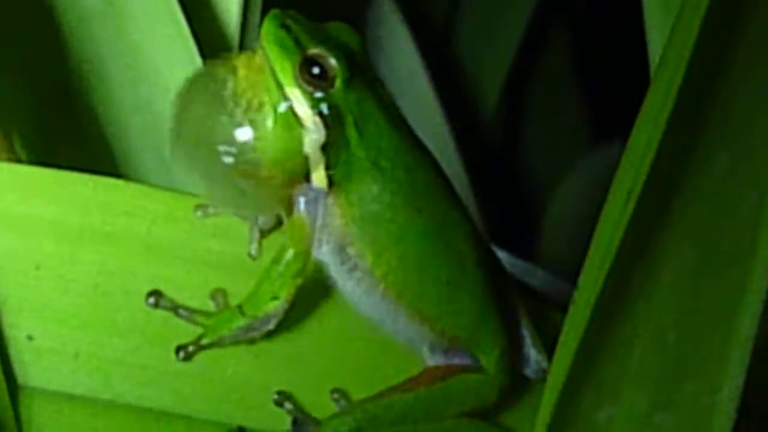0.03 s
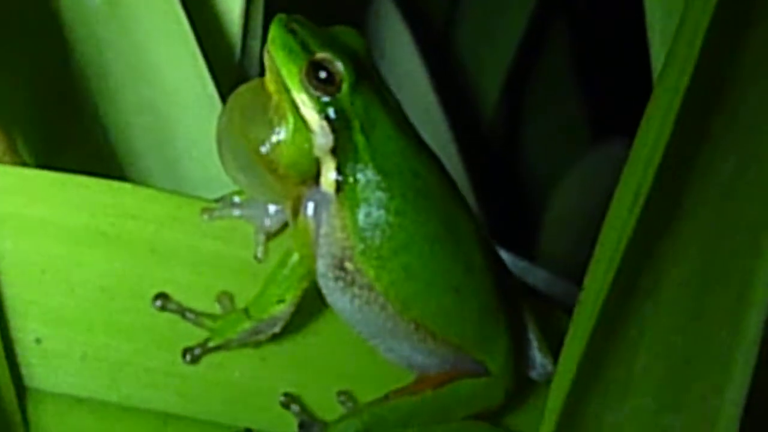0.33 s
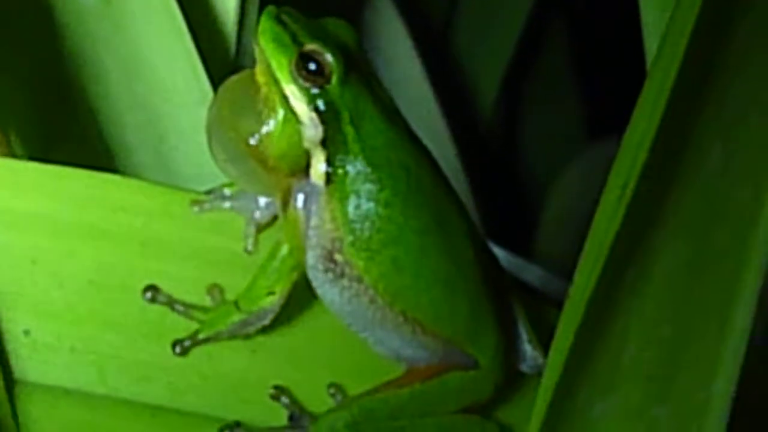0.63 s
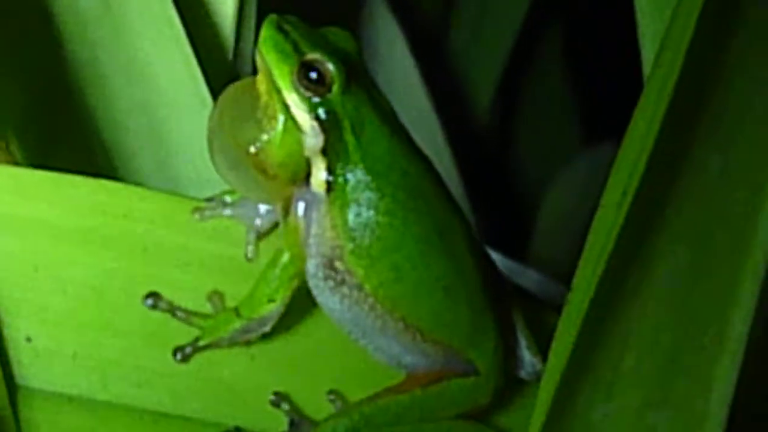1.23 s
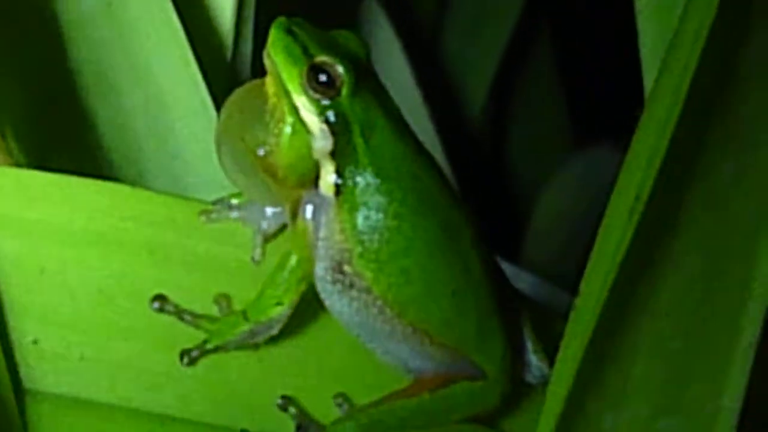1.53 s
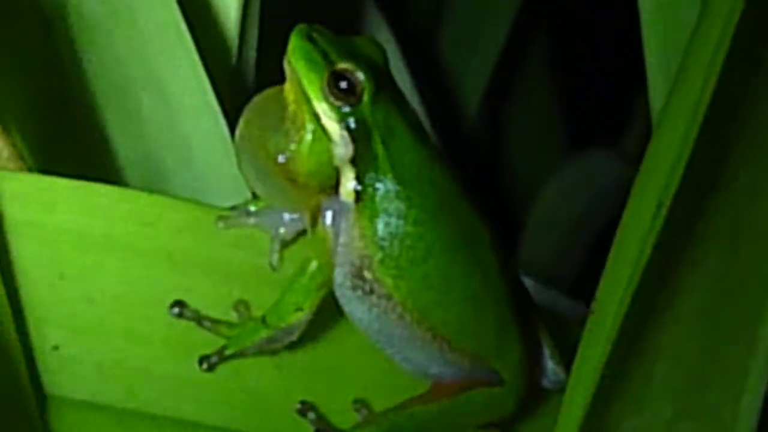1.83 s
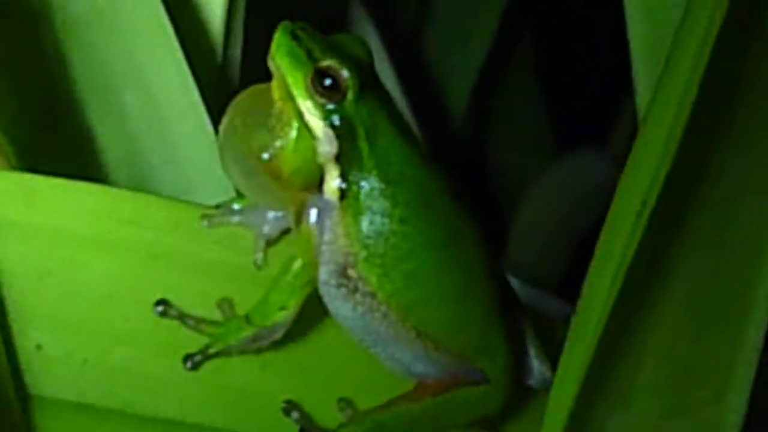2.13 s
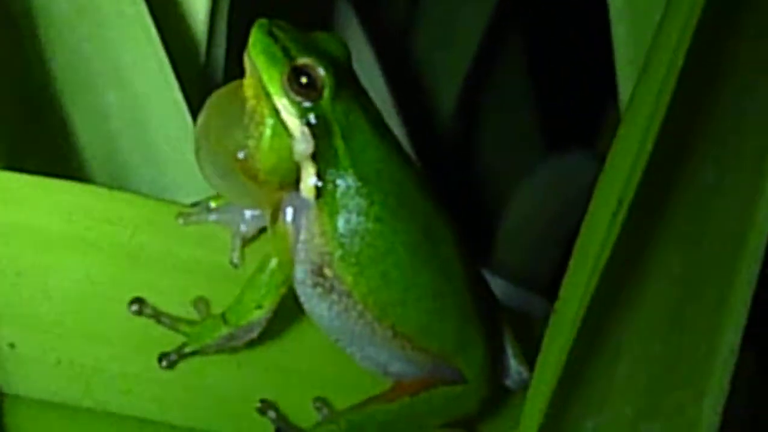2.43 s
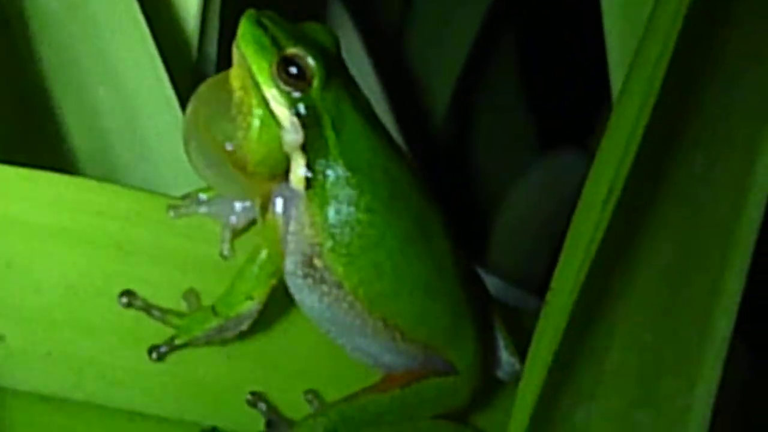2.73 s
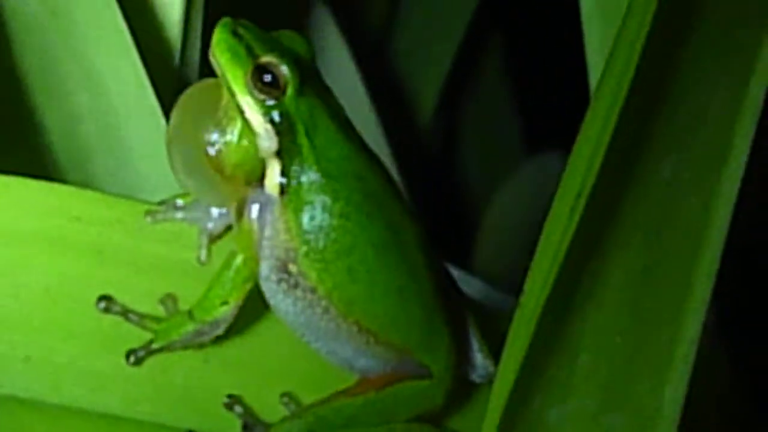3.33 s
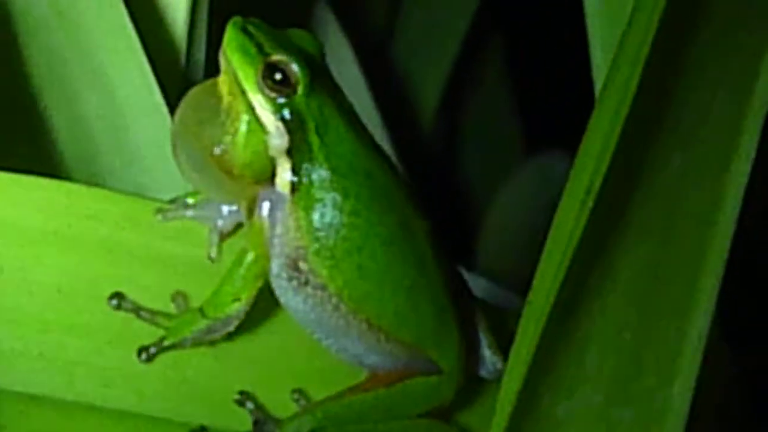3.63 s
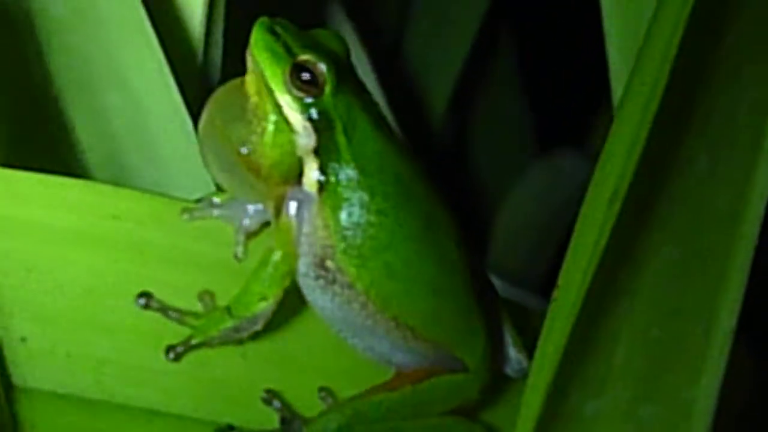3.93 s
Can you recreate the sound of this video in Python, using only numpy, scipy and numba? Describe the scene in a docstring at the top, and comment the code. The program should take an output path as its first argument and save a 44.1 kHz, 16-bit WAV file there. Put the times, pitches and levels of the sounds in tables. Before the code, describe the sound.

A small tree frog close by gives one brief, high ratchety note. Farther off, two frogs bleat in long overlapping trills, then a neighbouring tree frog answers twice. Thin insect buzzes and a distant chorus fill the night foliage.

```python
"""First a small tree frog on a nearby leaf gives one brief ratchety note, a quick run of tiny tones. Farther
off, one frog and then another bleat: pulses ring their throats in long overlapping trills that slow down and
rise in tone. Insects and a distant caller buzz thinly meanwhile, and a far frog starts to croak. Near the end a
neighbour answers the tree frog twice. All along, leaves scatter the notes and trills over a distant chorus and
a low rumble, and the recorder turns itself down after sharp notes."""
import sys
import numpy as np
from scipy import signal
from scipy.fft import rfft, irfft
from scipy.io import wavfile
from scipy.ndimage import uniform_filter1d
from numba import njit

SR = 44100
rng = np.random.default_rng(int(sys.argv[2]) if len(sys.argv) > 2 else 0)


def inscribe(sig):
    """Save sig as 16-bit PCM at rate SR to the path in sys.argv[1].

    A 1-D sig is mono; a 2-D sig holds one channel per row.
    Samples are clipped to [-1, 1] before scaling.
    """
    pcm = np.round(np.clip(np.atleast_2d(sig).T, -1, 1) * 32767)
    wavfile.write(sys.argv[1], SR, pcm.astype(np.int16))


N = 176400  # 4 seconds


# the tiny tones in the close frog's note: t/s, level/dB, f/Hz, length/s
TREE_FROG_PULSES = [(.0022, -6.8, 3580, .0038), (.0092, -3.2, 3680, .004), (.0173, -4.8, 3760, .0048),
                    (.0246, -7.5, 3850, .0062), (.04, -8, 3540, .0108)]

def tree_frog():
    """A close frog's ratchety note, with only a little echo from the leaves."""
    call = note(TREE_FROG_PULSES, sag_hz_per_s=65000, overtone_db=-21, rasp_db=-27, skew=.45)
    return undb(.5) * foliage(call, leaves_db=-20, leaves_s=.014, tail_db=-19, tail_s=.35)


# the tiny tones in the two answering notes: t/s, level/dB, f/Hz, length/s
ANSWER_PULSES = [(3.3964, -19.5, 3850, .0015), (3.4031, -13.5, 4050, .0015), (3.4104, -15, 4100, .0016),
                 (3.4178, -16.5, 4250, .0018), (3.425, -24, 4600, .002), (3.436, -16.5, 4400, .002),
                 (3.4431, -23, 4550, .0016), (3.4593, -28, 4600, .0016), (3.4673, -32, 4300, .0016),
                 (3.65, -18, 4200, .0016), (3.6516, -21, 4700, .003), (3.6549, -15.5, 4500, .0018),
                 (3.6568, -17, 4700, .0028), (3.6654, -21, 4100, .003), (3.6735, -29, 3800, .004)]

def neighbour():
    """Another tree frog answers twice, raspier and more scattered by the leaves."""
    call = note(ANSWER_PULSES, sag_hz_per_s=17000, overtone_db=-35, rasp_db=-15, skew=.89)
    return undb(1.5) * foliage(call, leaves_db=-5.5, leaves_s=.014, tail_db=-8, tail_s=.45)


# how each frog's bleat changes as it goes: t/s, pulse rate/Hz, throat f/Hz, level/dB
EARLY_BLEAT = [(.6945, 101, 2110, -52), (.8, 100.4, 2190, -45), (.95, 99.6, 2290, -39),
               (1.15, 98.1, 2360, -33.5), (1.4, 96.3, 2440, -34), (1.6, 95.4, 2560, -36.5),
               (1.8, 94.8, 2600, -36), (2.1, 94, 2590, -35.5), (2.3, 93.5, 2560, -44)]
LATE_BLEAT = [(1.5462, 104.7, 2150, -39.5), (1.88, 100.5, 2274, -35.5), (2.0, 99.26, 2290, -34),
              (2.199, 97.08, 2515, -34), (2.548, 96.19, 2670, -33), (2.9, 94.66, 2650, -34),
              (3.199, 95.66, 2783, -35), (3.398, 94.8, 2820, -51)]
# the steady tones at which a frog's body rings: f/Hz, width/Hz, level/dB
BODY_TONES = [(1480, 290, -11.5), (1960, 450, -13.5)]

def bleats():
    """Slowing pulses ring two rising throat tones, and body tones that grow as the vocal sac fills."""
    throats, bodies, t = np.zeros(N), np.zeros(N), times()
    fade_s, sac_fill_s, band_hz = .049, 1, (840, 6700)
    for bleat in (EARLY_BLEAT, LATE_BLEAT):
        at, rate, hz, db = np.array(bleat).T
        start, length = at[0], at[-1] - at[0]
        pulses = clicks(np.interp(t, at, rate), jitter=.0035, scatter_db=1.2, start=start)
        effort = undb(np.interp(t, at, db) + .39 * drift(18)) * swell(start, length, fade_s, fade_s)
        effort *= np.sqrt(np.mean(t > start))  # so a late start does not make the call louder
        pitch = np.interp(t, at, hz) * (1 + .01 * drift(70))
        upper_hz = 3216 + .43 * (pitch - hz[0])  # follows only part of the rise
        lower = unit(ring(pulses, pitch, width_hz=220))
        upper = unit(ring(pulses, upper_hz, width_hz=190))
        throats += effort * (lower + undb(-16) * upper)
        body = sum(undb(level) * unit(ring(pulses, f, width)) for f, width, level in BODY_TONES)
        sac_fullness = np.clip(.32 + (t - start) / sac_fill_s, 0, 1)
        bodies += effort * body * sac_fullness
    throats = foliage(throats, leaves_db=-7, leaves_s=.008, tail_db=-3, tail_s=.55)
    bodies = foliage(bodies, leaves_db=-8, leaves_s=.004, tail_db=-4, tail_s=.7)
    return signal.sosfilt(signal.butter(2, band_hz, "bandpass", fs=SR, output="sos"), throats + bodies)


# brief loud peaks in the bleats: t/s, level/dB, f/Hz
BLEAT_PEAKS = [(1.476, -21, 2450), (1.885, -21, 2450), (1.906, -22, 2450), (2.149, -17.5, 2490),
               (2.159, -18, 2550), (2.1794, -17.5, 2610), (2.2727, -21, 2610), (2.2844, -22, 2630),
               (2.2944, -23, 2610), (3.202, -23, 2700)]

def bleat_peaks(length_s=.0035):
    """Short tones add brief loud peaks that stand out from the bleats' pulses."""
    tones = [(start, db, hz, length_s) for start, db, hz in BLEAT_PEAKS]
    peaks = note(tones, sag_hz_per_s=20000, overtone_db=-45, rasp_db=-34, skew=.6)
    return foliage(peaks, leaves_db=-11, leaves_s=.006, tail_db=-10, tail_s=.5)


# each high buzz, from insects near 7 kHz or a distant caller near 4.8 kHz: t/s, length/s, f/Hz, level/dB
HIGH_BUZZES = [(.77, 0.8, 7000, -61.5), (2.433, 0.82, 7000, -60), (0.894, 0.19, 4870, -53),
               (1.38, 0.22, 4750, -53.5), (3.223, 0.32, 4710, -54.5)]

def high_buzzes():
    """Thin high buzzes come and go, each a narrow band of fluttering hiss: insects near 7 kHz, a distant caller
    near 4.8 kHz."""
    out = np.zeros(N)
    for start, length, hz, db in HIGH_BUZZES:
        hiss = ring(rng.standard_normal(N), hz, width_hz=280)
        buzz = unit(hiss * undb(2 * drift(120)))
        out += buzz * undb(db) * swell(start, length, attack_s=.043, release_s=.078)
    return out


# each short, low croak: t/s, length/s, level/dB
FAR_CROAKS = [(2.563, 0.099, -52.5), (3.134, 0.17, -57), (3.947, 0.19, -53)]

def croaks():
    """A far frog's uneven pulses ring one low, dull tone."""
    voice = unit(ring(clicks(rate_hz=70, jitter=.297, scatter_db=1.2), hz=678, width_hz=113))
    return voice * sum(undb(db) * swell(start, length, .0078, .014) for start, length, db in FAR_CROAKS)


# how loud the far trills are: t/s, level/dB
TRILL_LEVELS = [(0, -102), (.65, -54), (1.7, -36.5), (3.379, -39), (3.5, -49.5), (4, -48.5)]

def far_trills():
    """Two trilling frogs stand out of the chorus, blurred by the leaves."""
    pulses = np.zeros(N)
    for rate_hz in (88, 110):
        train = clicks(rate_hz * (1 + .04 * drift(5)), jitter=.0502, scatter_db=3.5)
        pulses += train * undb(1.2 * drift(6))
    upper = unit(ring(pulses, hz=2422, width_hz=450))
    lower = unit(ring(pulses, hz=1552, width_hz=180))
    trills = foliage(upper + undb(-4) * lower, leaves_db=2, leaves_s=.018, tail_db=-6, tail_s=.92)
    return unit(trills) * undb(curve(TRILL_LEVELS))


# the chorus's mix of low and high sound: f/Hz, level/dB
CHORUS_COLOUR = [(300, -23), (700, -9.5), (1050, -9.5), (1300, -5.5), (1550, 3), (1900, -1), (2650, 4.5),
                 (3300, 1), (3700, -4.5), (4100, -0.5), (4400, -7.5), (4750, 0.5), (5400, -15.5),
                 (6300, -16), (7250, -9.5), (7900, -27), (8800, -27)]
# how loud the chorus is: t/s, level/dB
CHORUS_LOUDNESS = [(0, -44), (0.601, -48.5), (1.298, -44), (3.3, -42.5), (3.55, -45), (4, -46)]

def chorus():
    """Countless far callers merge into a flickering wash of noise."""
    return coloured_noise(CHORUS_COLOUR) * undb(curve(CHORUS_LOUDNESS) + .87 * drift(12))


# the rumble's mix of low and high sound: f/Hz, level/dB
AIR_COLOUR = [(40, -14), (120, 1.5), (300, -3), (700, -6), (1050, -20), (3000, -40.5)]
# how loud the rumble is: t/s, level/dB
AIR_LOUDNESS = [(0, -55), (.7, -57.5), (1.5, -55.5), (2.3, -53), (4, -55)]

def night_air():
    """The night air makes a low, wavering rumble."""
    return coloured_noise(AIR_COLOUR) * undb(curve(AIR_LOUDNESS) + drift(14))


def note(pulses, sag_hz_per_s, overtone_db, rasp_db, skew):
    """Each pulse is a short tone that swells fast and sags in pitch, with an octave and some rasp."""
    out = np.zeros(N)
    rasp = unit(ring(rng.standard_normal(N), hz=5200, width_hz=2400))
    for start, db, hz, length in pulses:
        age = np.clip(times() - start, 0, length)
        phase = 2 * np.pi * (hz * age - sag_hz_per_s * age * (age - length / 2) / 2)
        shape = np.sin(np.pi * (age / length) ** skew) ** 2  # a smaller skew peaks sooner
        tone = np.sin(phase) + undb(overtone_db) * np.sin(2 * phase)
        out += undb(db) * shape * (tone + undb(rasp_db) * rasp)
    return out


def clicks(rate_hz, jitter, scatter_db, start=0):
    """A train of pulses, uneven in timing (jitter, a share of one gap) and in strength."""
    timing, strength = rng.standard_normal((512, 2)).T
    cycles = np.cumsum(rate_hz * np.ones(N)) / SR
    due = np.arange(len(timing)) + jitter * timing
    at = np.interp(due, cycles - cycles[int(start * SR)], np.arange(N))
    size = undb(scatter_db * strength) * (at < N - 1)
    i = at.astype(int)  # each pulse is shared between samples i and i + 1
    return (np.bincount(i, size * (1 - at + i), N + 1) + np.bincount(i + 1, size * (at - i), N + 1))[:N]


def foliage(x, leaves_db, leaves_s, tail_db, tail_s):
    """Direct sound, quick echoes off nearby leaves, and a longer tail from the bush."""
    t = np.arange(SR // 2) / SR
    noise = rng.standard_normal((2, len(t))) * (t > .0015)
    early = noise[0] * np.exp(-t / leaves_s)
    late = noise[1] * np.exp(-np.log(1000) * t / tail_s)  # falls 60 dB in tail_s
    echo = (undb(leaves_db) * unit(early) + undb(tail_db) * unit(late)) / np.sqrt(len(t))
    return x + signal.fftconvolve(x, echo)[:N]


def ring(x, hz, width_hz):
    """Make a sound ring at one pitch by filtering it twice."""
    centre, wide = hz * np.ones(len(x)), float(width_hz) * np.pi / 2
    return band_pass(band_pass(x, centre, wide), centre, wide)


@njit
def band_pass(x, hz, width_hz):
    """Keep only the sound near a pitch that may move."""
    y, band_state, low_state = np.empty(len(x)), 0., 0.
    for i in range(len(x)):
        tuning, damping = np.tan(np.pi * hz[i] / SR), width_hz / hz[i]
        band = (band_state + tuning * (x[i] + 1e-18 - low_state)) / (1 + tuning * (tuning + damping))
        band_state = 2 * band - band_state
        low_state += 2 * tuning * band
        y[i] = damping * band
    return y


def coloured_noise(spectrum):
    """Noise shaped by (f/Hz, level/dB) points."""
    hz, db = np.array(spectrum).T
    f = np.maximum(np.arange(N // 2 + 1) * SR / N, 1)
    gain = undb(np.interp(np.log(f), np.log(hz), db))
    return unit(irfft(rfft(rng.standard_normal(N)) * gain, N))


def drift(rate_hz):
    """A smooth random wobble of size about 1."""
    hold = int(SR / rate_hz)
    steps = np.repeat(rng.standard_normal(N // hold + 2), hold)
    return unit(uniform_filter1d(steps, hold)[:N])


def swell(start, length, attack_s, release_s):
    """Fade in, hold, fade out."""
    age = times() - start
    return np.clip(age / attack_s, 0, 1) * np.clip((length - age) / release_s, 0, 1)


def curve(points):
    """Join (t/s, value) points with straight lines."""
    return np.interp(times(), *np.array(points).T)


def undb(db):
    """Turn decibels into a multiplier."""
    return 10 ** (np.asarray(db) / 20)


def unit(x):
    """Scale to an average strength (rms) of 1."""
    return x / np.sqrt(np.mean(x ** 2) + 1e-20)


def times():
    """The time of each sample in seconds."""
    return np.arange(N) / SR


@njit
def follow(x, attack_s, release_s):
    """Track loudness, rising over attack_s and falling over release_s."""
    y, level = np.empty(len(x)), 0.
    for i in range(len(x)):
        lag_s = attack_s if abs(x[i]) > level else release_s
        level += (abs(x[i]) - level) / (lag_s * SR)
        y[i] = level
    return y


def scene():
    """All the callers and the night air, heard from one spot."""
    frogs = tree_frog() + neighbour() + bleats() + bleat_peaks()
    background = high_buzzes() + croaks() + far_trills() + chorus() + night_air()
    return (frogs + background)[None]


# narrow bands that the recorder cuts out: f/Hz, width/Hz
RECORDER_DIPS = [(3010, 450), (4400, 150), (8000, 170)]

def record(dry):
    """The recorder turns down after loud high notes, then cuts narrow bands and the highest treble."""
    listen_above_hz, threshold_db, duck_strength = 3260, -28.5, .47
    roll_off_hz, top_hz = 7820, 8900
    treble = signal.sosfilt(signal.butter(4, listen_above_hz, "highpass", fs=SR, output="sos"), dry[0])
    level = follow(treble, attack_s=.00092, release_s=.13)
    out = dry * np.maximum(level / undb(threshold_db), 1) ** -duck_strength
    for hz, width in RECORDER_DIPS:
        out = signal.lfilter(*signal.iirnotch(hz, hz / width, fs=SR), out)
    out = signal.sosfilt(signal.butter(8, roll_off_hz, fs=SR, output="sos"), out)
    return signal.sosfilt(signal.ellip(10, .2, 80, top_hz, fs=SR, output="sos"), out)


dry = scene()
out = record(dry)
inscribe(out)
```